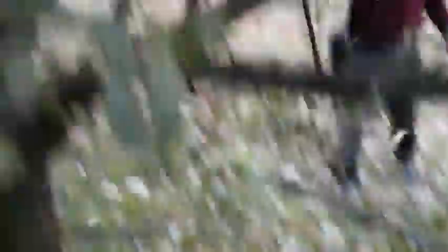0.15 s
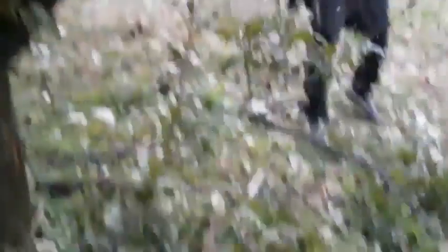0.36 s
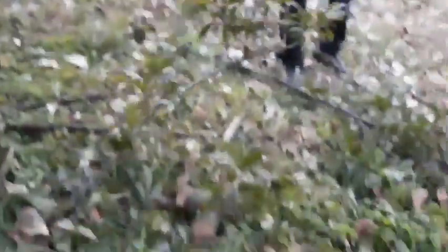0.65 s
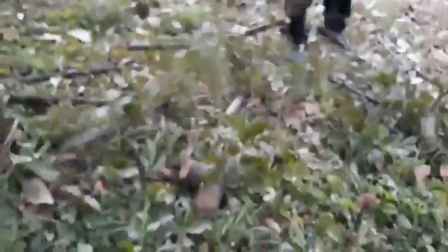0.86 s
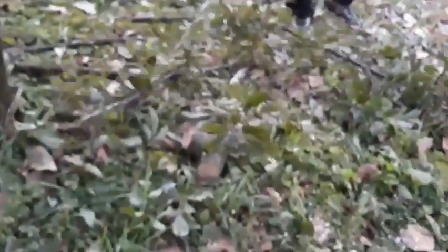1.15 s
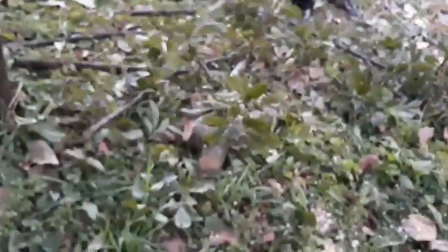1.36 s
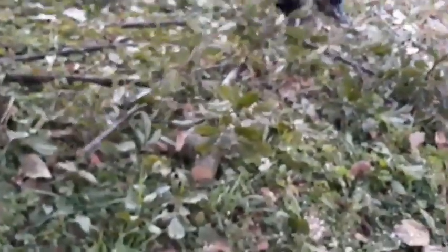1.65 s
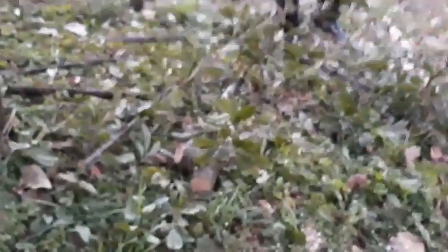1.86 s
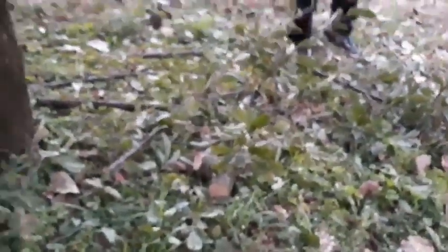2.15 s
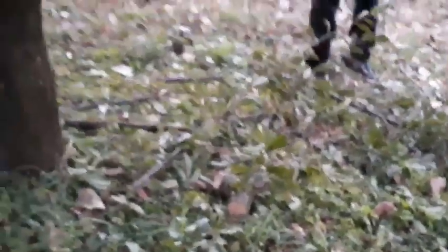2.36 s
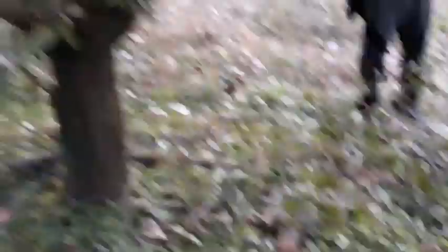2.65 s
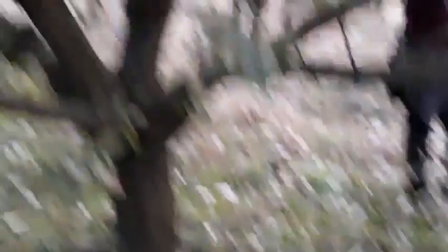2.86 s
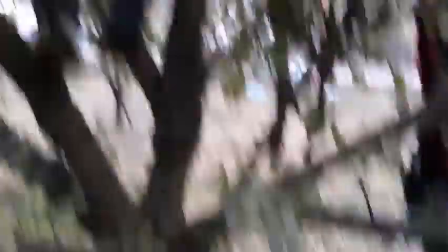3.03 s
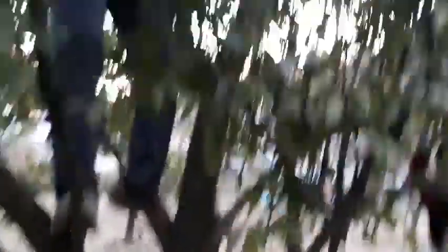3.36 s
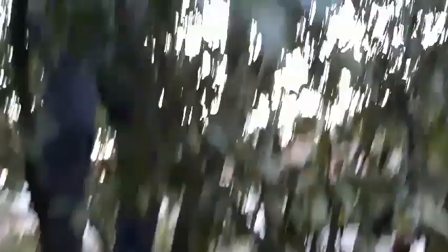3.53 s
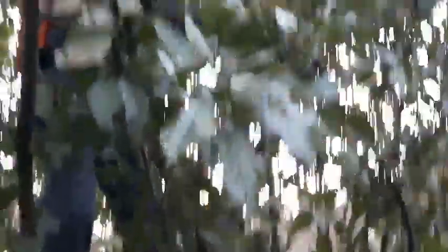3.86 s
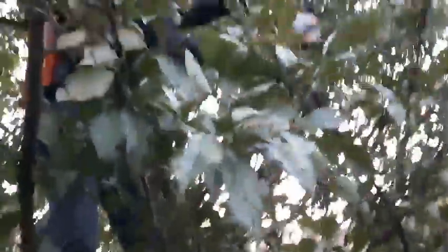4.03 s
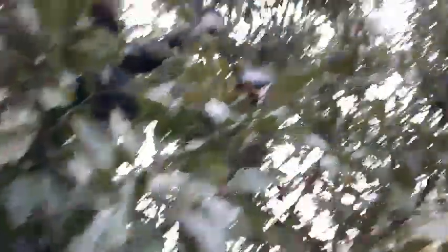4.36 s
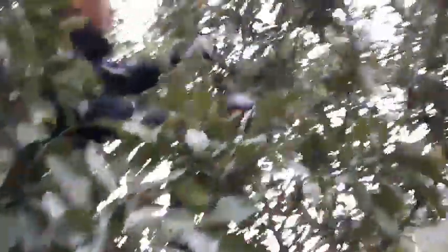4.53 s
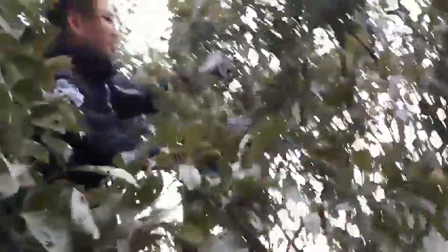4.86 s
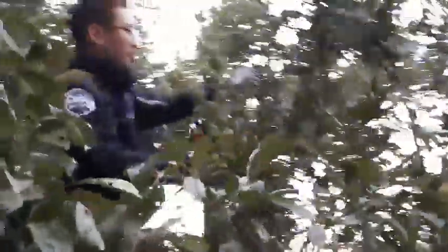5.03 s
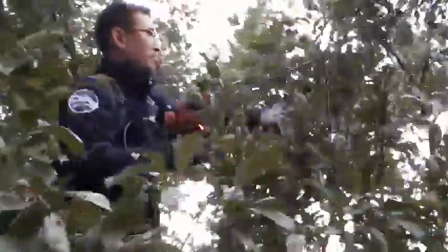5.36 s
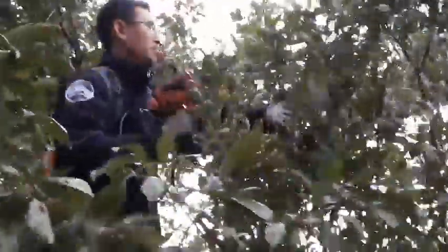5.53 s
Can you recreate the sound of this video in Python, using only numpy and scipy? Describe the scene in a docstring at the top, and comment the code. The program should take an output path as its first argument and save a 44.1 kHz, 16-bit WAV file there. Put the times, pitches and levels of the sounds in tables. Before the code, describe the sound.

A phone in an orchard picks up two bursts of a small battery chainsaw: sharp clack, rising electric whine, bright chain rattle, gritty bite into wood, quick wind-down and hard stop. Between them come dull footfalls, snapping twigs, stick taps and a bough brushing close by. After the second stop, leaves stir and a twig cracks loudly. A distant engine hums faintly beneath everything.

```python
"""Leaves rustle and a twig snaps in an orchard, over a low outdoor murmur and a far engine's hum.
A cordless pruning chainsaw clacks on, whines up, rattles, bites a branch, runs free and brakes to a stop.
In the gap come leaves, twigs, taps, a brushing bough and soft footfalls; a second run follows, then leaves
and twigs again. The saw is sine partials and link-timed scrapes that follow one motor pitch; the rest
is shaped noise, plus sines for hum and spring. Heard in mono on a phone."""
import sys
import numpy as np
from scipy import signal
from scipy.fft import rfft, irfft
from scipy.io import wavfile
from scipy.ndimage import uniform_filter1d

SR = 44100
rng = np.random.default_rng(int(sys.argv[2]) if len(sys.argv) > 2 else 0)


def unload_audio(sound):
    """Save the sound as a 16-bit wav file, at the path given as the first command line argument."""
    columns = np.transpose(np.atleast_2d(sound))
    # keep every value between -1 and 1, then stretch to whole-number steps
    steps = np.round(np.clip(columns, -1, 1) * 32767)
    wavfile.write(sys.argv[1], SR, steps.astype(np.int16))


N = 251370
TIME = np.arange(N) / SR  # s
FREQS = np.maximum(np.fft.rfftfreq(N, 1 / SR), 1)  # Hz

# Spectrum of the outdoor murmur. Each row: frequency in Hz, level in dB.
AIR_COLOUR = [(20, -31), (35, -33), (55, -30), (75, -4), (130, -4), (200, -6), (300, -9), (480, -6.5),
              (850, -12.5), (2000, -20), (4000, -29.5)]
# Swell of the deepest murmur. Each row: time in seconds, lift in dB.
RUMBLE_SWELL = [(0, 8), (2.5, 6.5), (4.2, 2.5), (5.7, -6)]
# Hum of the far engine. Each row: frequency in Hz, level at the start in dB, level at the end in dB.
ENGINE_HUM = [(71, -53.5, -67), (84.5, -57.5, -72), (141, -67.5, -56.5), (216, -59.5, -61.5),
              (335, -62.5, -62), (396, -70, -59)]
# Foliage stirring. Each row: peak in seconds, level in dB, top octave against it in dB,
# rise in seconds, fall in seconds.
LEAF_SWELLS = [(.04, -42, -17, 0.29, 0.18), (1.87, -42, -12, 0.061, 0.19), (2.03, -41.5, -14, 0.058, 0.1),
               (2.181, -45, -21, .05, 0.12), (2.37, -47, -7, .03, 0.044), (2.94, -43.5, -8, 0.052, 0.083),
               (3.19, -46, -3, 0.15, .1), (3.39, -40, -2, 0.067, 0.073), (3.62, -43.5, -9, 0.15, 0.073),
               (5.15, -40.5, -7, 0.061, 0.21), (5.26, -44, -9, 0.048, 0.12), (5.47, -42.5, -8, 0.062, 0.07),
               (5.69, -45.5, -8, 0.15, .1)]
# Spectrum of leaves and snapping twigs. Each row: frequency in Hz, level in dB.
LEAF_COLOUR = [(500, -16.5), (1200, -6.5), (2500, -4.5), (3700, -3.5), (4900, 4), (6500, 1), (8300, -2.5),
               (10000, -32.5), (12700, -25.5), (15500, -31)]
# A bough brushing past close by. Each row: peak in seconds, level in dB, rise in seconds, fall in seconds.
BOUGH_SWELLS = [(2.95, -45, 0.056, 0.18), (3.26, -41, 0.1, 0.18), (3.4, -43, .05, 0.082),
                (3.6, -50, .08, .05)]
# Spectrum of the brushing bough. Each row: frequency in Hz, level in dB.
BOUGH_COLOUR = [(300, -17), (900, 5), (2000, -7), (3400, -1), (5000, 5.5), (7000, -2), (8700, 7.5),
                (10200, -10), (12700, -8), (15500, -3)]
# Dry twigs snapping. Each row: start in seconds, level in dB, treble against the middle in dB,
# decay by 60 dB in seconds.
TWIG_SNAPS = [(.069, -36.5, -24, .062), (1.925, -46, -20, .017), (2.02, -46, -11, .056),
              (2.168, -41, -22, .03), (2.597, -48, -9, .04), (2.699, -43, -12, .08), (2.728, -51, 1, .049),
              (2.911, -43, -18, .03), (2.96, -42, -14, .04), (3.249, -32.5, -6, .045),
              (3.292, -40.5, 7, .025), (3.391, -38.5, 0, .032), (3.421, -38.5, 0.5, .05),
              (5.25, -38.5, -5, 0.087), (5.443, -29.5, -6, .055)]
# Resonances of the twigs. Each row: centre in Hz, width in Hz, lift in dB.
TWIG_MODES = [(5070, 400, 5.5), (6100, 470, -6)]
# Hard little sticks tapping. Each row: start in seconds, level in dB, ring in Hz, decay by 60 dB in seconds.
STICK_TAPS = [(2.435, -36.5, 5700, 0.044), (2.599, -39, 4760, .04), (2.638, -41, 5100, 0.027),
              (3.153, -35, 5300, .035)]
# Feet on soft ground and knocks on wood. Each row: start in seconds, level in dB, pitch in Hz,
# decay by 60 dB in seconds.
FOOTFALLS = [(2.092, -29, 450, 0.023), (2.592, -28.5, 285, 0.015), (2.843, -41.5, 130, 0.18),
             (3.088, -37.5, 173, 0.095), (3.233, -32.5, 330, .03), (3.25, -43, 140, 0.49),
             (4.041, -38, 170.3, 0.083)]
# Trigger, chain jerk and brake. Each row: start in seconds, level in dB, decay by 60 dB in seconds,
# ring of the spring in dB.
CLACK_BLOWS = [(0.157, -17, 0.038, -48), (.164, -20.5, 0.015, -49), (0.172, -20, 0.011, -46),
               (1.833, -19, 0.032, -42.5), (3.6493, -22, 0.035, -38), (3.657, -21.5, 0.011, -33),
               (3.663, -31, 0.015, -31), (5.092, -13.5, 0.029, -35)]
# Spectrum of the clacks. Each row: frequency in Hz, level in dB.
CLACK_COLOUR = [(150, -23), (450, -14.5), (730, -13), (1200, -6), (2000, -5.5), (3700, 0.5), (5200, -4),
                (7000, -5), (8700, -40), (10500, -14.5), (15000, -36)]
# Resonances of the clacking housing. Each row: centre in Hz, width in Hz, lift in dB.
CLACK_MODES = [(690, 460, 11.5), (1900, 440, 7.5), (3050, 190, 4.5), (3720, 260, 5.5), (5800, 290, 10),
               (7500, 180, 24), (9200, 220, -3)]
# Ringing tones of the spring. Each row: pitch in Hz, level against the ring in dB,
# decay by 60 dB in seconds.
SPRING_TONES = [(8860, 9, 0.047), (12800, 8.5, 0.091)]
# Pulls of the trigger. Each row: start in seconds, release in seconds, brake in seconds.
TRIGGER_PULLS = [(.16, 1.612, 1.833), (3.648, 4.882, 5.093)]
# Whine pitch with the trigger held, sagging in the wood and overshooting as the cut ends; one list per run.
# Each row: time in seconds, pitch in Hz.
HELD_PITCH = [
    [(.42, 811.5), (.56, 821.4), (.78, 819), (.87, 797), (1.3, 807.7), (1.48, 850.3), (1.61, 834.4)],
    [(3.89, 810), (3.98, 821), (4.22, 811), (4.3, 804.5), (4.42, 826), (4.7, 842), (4.88, 834)],
]
# Which way the saw points. Each row: time in seconds, position counted from 0.
SAW_POSITION = [(2, 0), (3.5, 1), (4.15, 1), (4.55, 2)]
# Partials of the whine. Each row: multiple of the pitch, level in dB at full speed in each of the saw's
# three positions, surge in dB, change in the wood in dB, level in dB when well below full speed.
WHINE_PARTIALS = [(1, -35.5, -44, -41.5, 1.8, -6.5, -37), (2, -34, -33.5, -45, 4, -4, -38.5),
                  (2.5, -54, -54, -43, 1, 0, -43), (3, -31.5, -36, -42.5, 3.4, 2.5, -34.5),
                  (3.5, -44, -41, -55, 2.7, -3, -43), (5, -41, -49, -49, 1, 4, -38),
                  (6, -34.5, -36.5, -33, 7.8, -5, -39)]
# Housing resonance the whine sweeps through. Each row: centre in Hz, width in Hz, lift in dB.
WHINE_MODES = [(669, 150, 9)]
# Chain rattle at full speed, one row per position. Each row: level in dB, top octave against it in dB,
# rise in the wood in dB.
CHAIN_LEVELS = [(-22.5, -11, 3.5), (-20.5, -2.5, 2), (-21.5, -7, 3.5)]
# Spectrum of the running chain, one list per position. Each row: frequency in Hz, level in dB.
CHAIN_COLOURS = [
    [(150, -18.5), (500, -20.5), (680, -8.5), (1100, -9.5), (1500, -6.5), (1950, 3.5), (2500, 1),
     (2950, -4.5), (4800, 2.5), (7400, 0.5), (8500, -5), (10000, -19), (12700, -10.5), (15500, -19)],
    [(150, -23), (500, -17), (720, -3.5), (1050, -12), (1400, -8), (1900, -8.5), (2900, -3.5), (4200, -0.5),
     (5200, 4), (6800, -1), (8400, 2.5), (10000, -17), (12400, -11.5), (15500, -18.5)],
    [(150, -20.5), (480, -10.5), (720, -12.5), (1050, -4.5), (1400, -12), (1900, 0), (2900, 0), (4200, 4.5),
     (5200, 8), (6800, 5), (8400, 3.5), (10000, -17), (12800, -8), (15500, -16.5)],
]
# Resonances of bar and housing, one list per position. Each row: centre in Hz, width in Hz, lift in dB.
BAR_MODES = [
    [(655, 140, 5), (1353, 35, 8.5), (1870, 180, 2.5), (2370, 110, 5), (2630, 34, 1.5), (3586, 66, 4),
     (4010, 79, 7), (4480, 77, 0.5), (5300, 150, 2.5), (6470, 130, 1), (7400, 180, 0.5)],
    [(1182, 50, 9), (1780, 150, 9), (1963, 54, 11), (2430, 91, 7.5), (3080, 22, 9), (3730, 250, 9),
     (4530, 93, 2), (8350, 350, 1), (11700, 180, 3.5)],
    [(652, 35, 12), (813, 68.4, 14), (1695, 85, 6), (2520, 110, 2), (3760, 96, 1.5), (5200, 85, 4.5),
     (5860, 83, 5)],
]
# Teeth biting wood, one list per run. Each row: time in seconds, level in dB.
BITE_LEVELS = [
    [(.74, -48), (.82, -28), (.88, -27), (1.05, -18.5), (1.18, -22.5), (1.3, -21), (1.44, -19.5),
     (1.48, -29), (1.54, -52)],
    [(4.15, -45), (4.25, -33.5), (4.3, -22), (4.35, -32), (4.39, -26), (4.47, -27), (4.54, -28),
     (4.66, -25.5), (4.72, -42.5), (4.8, -85)],
]
# Spectrum of each branch as the teeth shake it, one list per run. Each row: frequency in Hz, level in dB.
BRANCH_COLOURS = [
    [(100, -33), (280, -27.5), (550, -17), (720, -9.5), (1020, -13), (1400, -4.5), (1800, -16), (2250, -1),
     (2800, -10.5), (4000, -20), (7000, -8), (11000, -29)],
    [(100, -25.5), (280, -9.5), (520, -18), (760, 1), (1000, -7.5), (1300, -6), (1750, -7.5), (2300, -7.5),
     (2900, -26), (5200, -25), (8000, -1), (11000, -24)],
]
# Resonances of each branch with the bar in it, one list per run. Each row: centre in Hz, width in Hz,
# lift in dB.
BRANCH_MODES = [
    [(390, 29, 18.5), (706, 36, 12), (2240, 80, -2), (2390, 87, 4.5), (3090, 240, 12), (3800, 110, 10)],
    [(405, 62, 17), (825, 94, 3.5), (1134, 32, 12), (1782, 34, 18), (2670, 92, 8)],
]

AIR_DB = -50.5
LEAF_FLOOR_DB, LEAF_FLOOR_TOP_DB = -53, -7  # the trees are never quite still
# the motor jumps to a starting pitch, then gains and loses speed at steady rates
KICK_HZ, SPIN_UP_HZ_PER_S, WIND_DOWN_HZ_PER_S = 361.1, 1830, 2120
FULL_HZ = 812  # whine pitch at full speed
SLOW_HZ = 55  # this far below full speed the drive runs slack
WHINE_DB_PER_OCTAVE = 17  # louder with speed
CHAIN_DB_PER_OCTAVE, CHAIN_TOP_DB_PER_OCTAVE = 7, 6  # louder and brighter with speed
CHAIN_SURGE_DB, SURGE_S = .6, .2  # whine and chain swell as full speed is reached, then settle
COAST_DB, COAST_S = -0.6, 0.13  # the chain slackens and quietens after the release
IN_WOOD_DB = 7.5  # within this of its hardest bite the bar counts as fully in the wood
TOP_HZ = 15480  # where the phone cuts the treble


def undb(db):
    """Decibels to gain."""
    return 10 ** (np.asarray(db) / 20)


def curves(rows):
    """The columns of a table, joined by straight lines in time."""
    s, *columns = np.transpose(rows)
    return [np.interp(TIME, s, column) for column in columns]


def unit(x):
    """Scale to rms 1."""
    return x / np.sqrt(np.mean(x ** 2) + 1e-18)


def band(x, lo_hz, hi_hz):
    """Keep one band, with steep skirts."""
    low_cut = 1 + (lo_hz / FREQS) ** 24
    high_cut = 1 + (FREQS / hi_hz) ** 24
    return irfft(rfft(x) / low_cut / high_cut, N)


def lift(hz, modes):
    """How many dB a set of resonances adds at a frequency."""
    return sum(db / (1 + (2 * (hz - centre) / width) ** 2) for centre, width, db in modes)


def colour(x, points, modes=()):
    """Causal filter: a smooth spectrum with resonances standing on it."""
    hz, db = np.transpose(points)
    db = np.interp(np.log(FREQS), np.log(hz), db) + lift(FREQS, modes)
    # folding the cepstrum forward gives minimum phase: no ringing ahead of a hit
    cepstrum = irfft(np.log(unit(undb(db))), N)
    cepstrum[1:N // 2] *= 2
    cepstrum[N // 2 + 1:] = 0
    return irfft(rfft(x) * np.exp(rfft(cepstrum)), N)


def walk(rate):
    """Smooth random drift of rms 1 that changes about rate times a second."""
    return unit(irfft(rfft(rng.standard_normal(N)) * np.exp(-(FREQS / rate) ** 2), N))


def grains(rate, spread_db):
    """Tiny impacts at random moments, about rate a second, of uneven size."""
    size = undb(spread_db * np.clip(rng.standard_normal(N), -2, 2))
    struck = rng.random(N) < rate / SR
    return unit(struck * size * rng.choice([-1, 1], N))


def fade(start, t60):
    """Exponential decay from a moment on, by 60 dB in t60 seconds."""
    return (TIME >= start) * undb(-60 * np.clip((TIME - start) / t60, 0, 3))


def swell(s, rise, fall):
    """Grows towards a moment and dies away after it."""
    return np.exp(-np.maximum((s - TIME) / rise, (TIME - s) / fall))


def gate(first, last, lead, tail):
    """Open from first to last, with short ramps outside (all in seconds)."""
    return np.interp(TIME, [first - lead, first, last, last + tail], [0, 1, 1, 0])


def aimed(x, db, top_db):
    """Set the level of a hiss, evened over half a second, and of its top octave against it."""
    def strength(v):
        return np.sqrt(uniform_filter1d(v ** 2, size=SR // 2))
    body = band(x, 1, 9700) / strength(band(x, 2900, 9000))
    top = band(x, 9700, 20000)
    return undb(db) * (body + undb(top_db) * top / strength(top))


def distance():
    """Low outdoor murmur from filtered noise, and a far engine's hum from slightly wavering sines."""
    murmur = unit(colour(rng.standard_normal(N), AIR_COLOUR))
    air = undb(AIR_DB + 1.2 * walk(1.5)) * murmur
    rumble = band(air, 1, 100)
    out = air - rumble + rumble * undb(*curves(RUMBLE_SWELL))
    for hz, first_db, last_db in ENGINE_HUM:
        phase = np.cumsum(hz * (1 + 0.00451 * walk(2.7))) / SR
        db = np.linspace(first_db, last_db, N) + 0.42 * walk(4.1)
        out = out + undb(db) * np.sqrt(2) * np.sin(2 * np.pi * phase)
    return out


def stirring():
    """Level of the rustle and of its top octave against it, in dB: the swells add up over a faint floor."""
    swells = [(undb(db) * swell(s, rise, fall), top_db) for s, db, top_db, rise, fall in LEAF_SWELLS]
    swells.append((undb(LEAF_FLOOR_DB), LEAF_FLOOR_TOP_DB))
    power = sum(gain ** 2 for gain, _ in swells)
    top_power = sum((gain * undb(top_db)) ** 2 for gain, top_db in swells)
    return 10 * np.log10(power), 10 * np.log10(top_power / power)


def rustle():
    """Leaves brush against each other in dense, unsteady crackles."""
    crackle = grains(4000, 1.6) * undb(1.75 * walk(28))
    level_db, top_db = stirring()
    return aimed(colour(crackle, LEAF_COLOUR), level_db, top_db)


def brush():
    """Stiff leaves scrape close by, in coarser and sparser grains than the rustle."""
    gain = np.sqrt(sum((undb(db) * swell(s, rise, fall)) ** 2 for s, db, rise, fall in BOUGH_SWELLS))
    scrape = grains(2500, 2.7) * undb(1.6 * walk(30))
    return unit(colour(scrape, BOUGH_COLOUR)) * gain


def twigs(tick_t60=0.002, tick_db=3.0, settle_t60=0.24, settle_db=-22):
    """A twig breaks with a sharp tick, splinters, and the leaves around it settle."""
    crack = colour(rng.standard_normal(N), LEAF_COLOUR, TWIG_MODES)
    body = unit(band(crack, 1, 9000))
    treble = unit(band(crack, 9000, 20000))
    out = 0
    for s, db, treble_db, t60 in TWIG_SNAPS:
        tick = undb(tick_db) * fade(s, tick_t60)
        settling = undb(settle_db) * fade(s, settle_t60)
        shape = tick + fade(s, t60) + settling
        out = out + undb(db) * shape * (body + undb(treble_db) * treble)
    return out


def stick_taps(width_hz=1100):
    """Short bright taps, each noise through one resonance, dying quickly."""
    out = 0
    for s, db, hz, t60 in STICK_TAPS:
        resonance = 1 + (2 * (FREQS - hz) / width_hz) ** 2
        ring = unit(irfft(rfft(rng.standard_normal(N)) / resonance, N))
        out = out + undb(db) * fade(s, t60) * ring
    return out


def footfalls():
    """Dull thuds, each noise in a broad low band with a decaying envelope."""
    out = 0
    for s, db, hz, t60 in FOOTFALLS:
        low_band = signal.butter(2, [hz / 1.8, hz * 1.32], "band", fs=SR, output="sos")
        thud = unit(signal.sosfilt(low_band, rng.standard_normal(N)))
        softened = uniform_filter1d(fade(s, t60), size=100)
        out = out + undb(db) * thud * softened
    return out


def clacks(tail_t60=0.15, tail_db=-15):
    """Sharp knocks in the housing as the drive starts and brakes; a small spring rings with them."""
    blows, ring = 0, 0
    for s, db, t60, ring_db in CLACK_BLOWS:
        blows = blows + undb(db) * (fade(s, t60) + undb(tail_db) * fade(s, tail_t60))
        for hz, tone_db, tone_t60 in SPRING_TONES:
            tone = np.sin(2 * np.pi * hz * (TIME - s))
            ring = ring + undb(ring_db + tone_db) * fade(s, tone_t60) * tone
    return colour(blows * rng.standard_normal(N), CLACK_COLOUR, CLACK_MODES) + ring


def facing(values):
    """A quantity with one value for each position, as the saw turns."""
    position, = curves(SAW_POSITION)
    return np.interp(position, np.arange(len(values)), values)


def motor(run):
    """Whine pitch in Hz: a steady climb, the held speed, and a steady fall after the release."""
    start, release, _ = TRIGGER_PULLS[run]
    held, = curves(HELD_PITCH[run])
    climb = KICK_HZ + SPIN_UP_HZ_PER_S * (TIME - start)
    fall = held - WIND_DOWN_HZ_PER_S * np.maximum(TIME - release, 0)
    return np.maximum(np.minimum(climb, fall), KICK_HZ / 2)


def whine(phase, hz, in_wood, surge, flutter_db=2.6, slack=0.02, loose=.9):
    """Motor and gear tones; play in the drive shakes their phase, most while it is below full speed."""
    play = slack + loose * np.clip(1 - hz / FULL_HZ, 0, .3)  # radians
    angle = 2 * np.pi * phase + play * walk(200)
    slow = np.clip((FULL_HZ - hz) / SLOW_HZ, 0, 1) ** 2
    tones = 0
    for multiple, *position_dbs, surge_db, wood_db, slow_db in WHINE_PARTIALS:
        full_db = facing(position_dbs) + surge_db * surge + wood_db * in_wood
        speed_db = WHINE_DB_PER_OCTAVE * np.log2(hz / FULL_HZ) + lift(multiple * hz, WHINE_MODES)
        db = (1 - slow) * full_db + slow * slow_db + speed_db + flutter_db * walk(20)
        tones = tones + undb(db) * np.sin(multiple * angle + rng.uniform(0, 2 * np.pi))
    return np.sqrt(2) * tones


def link_hits(phase, scatter_db, ring):
    """A link strikes every second whine cycle, early or late, with its own force, and scrapes briefly."""
    link = np.abs(phase / 2 + .2 * walk(200))
    forces = undb(scatter_db * np.clip(rng.standard_normal(N // 10), -2, 2))
    force = forces[link.astype(int)]
    decay = np.exp(-(link % 1) / ring)  # ring counts in link spacings
    return unit(force * decay * grains(26000, 4.4))


def laps(x, phase, share=0.4, lap_cycles=44):
    """The same links come round again after one lap of the chain, so part of the rattle repeats."""
    return x + share * sum(np.interp(phase - lap * lap_cycles, phase, x) for lap in (1, 2))


def radiated(x):
    """The rattle's colour turns with the saw from one position to the next."""
    position, = curves(SAW_POSITION)
    out = 0
    for k, (points, modes) in enumerate(zip(CHAIN_COLOURS, BAR_MODES)):
        share = np.clip(1 - np.abs(position - k), 0, 1)
        out = out + share * colour(x, points, modes)
    return out


def chain(run, phase, hz, load, in_wood, surge):
    """Links rattle along the bar, louder and brighter with speed, unsteady under load."""
    links = laps(link_hits(phase, scatter_db=0.86, ring=1.65), phase)
    rattle = radiated(links * undb(1.0 * load * walk(46)))
    free_db, top_db, wood_db = (facing(column) for column in np.transpose(CHAIN_LEVELS))
    octaves = np.log2(hz / FULL_HZ)
    release = TRIGGER_PULLS[run][1]
    coasting = np.clip((TIME - release) / COAST_S, 0, 1)
    db = free_db + CHAIN_DB_PER_OCTAVE * octaves + CHAIN_SURGE_DB * surge
    db = db + wood_db * in_wood + COAST_DB * coasting
    return aimed(rattle, db, top_db + CHAIN_TOP_DB_PER_OCTAVE * octaves)


def cut(run, phase, bite_db):
    """Teeth chatter and snatch at the wood, and the branch resonates."""
    snatch = undb(4.0 * np.tanh(walk(110)))
    chatter = snatch * link_hits(phase, scatter_db=2.5, ring=0.91)
    wood = unit(colour(chatter, BRANCH_COLOURS[run], BRANCH_MODES[run]))
    first, last = BITE_LEVELS[run][0][0], BITE_LEVELS[run][-1][0]
    return wood * undb(bite_db) * gate(first, last, 0.04, .02)


def saw(run):
    """One run: whine, chain rattle and cutting teeth all follow the motor's turning."""
    start, _, brake = TRIGGER_PULLS[run]
    hz = motor(run)
    bite_db, = curves(BITE_LEVELS[run])
    load = undb(bite_db - bite_db.max())
    in_wood = np.minimum(load * undb(IN_WOOD_DB), 1)
    # the teeth snatch at the wood, so the speed wavers under load
    phase = np.cumsum(hz * (1 + .014 * load * walk(35))) / SR  # whine cycles
    full_speed_s = start + (FULL_HZ - KICK_HZ) / SPIN_UP_HZ_PER_S
    surge = swell(full_speed_s, SURGE_S / 2, SURGE_S)
    drive = whine(phase, hz, in_wood, surge) + chain(run, phase, hz, load, in_wood, surge)
    return drive * gate(start, brake, 0.016, 0.048) + cut(run, phase, bite_db)


def scene():
    """Everything reaches one microphone, so both channels are the same."""
    orchard = distance() + rustle() + brush() + twigs() + stick_taps() + footfalls()
    mono = orchard + clacks() + sum(saw(run) for run in range(len(TRIGGER_PULLS)))
    return np.array([mono, mono])


def record(dry):
    """The phone rounds the very highest peaks and cuts the top."""
    rounded = dry / (1 + (dry / .8) ** 6) ** (1 / 6)
    return signal.sosfilt(signal.ellip(10, .2, 80, TOP_HZ, fs=SR, output="sos"), rounded)


dry = scene()
out = record(dry)
unload_audio(out)
```